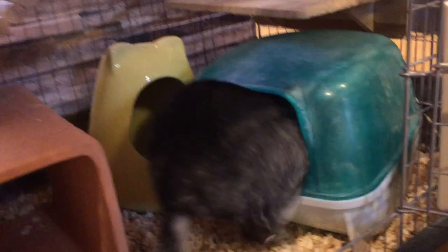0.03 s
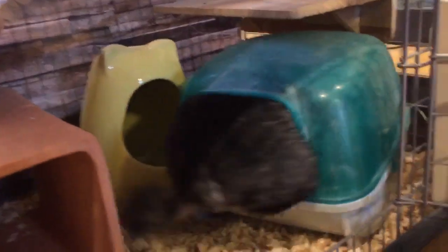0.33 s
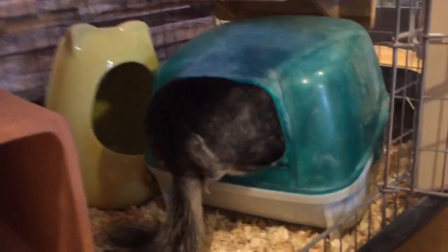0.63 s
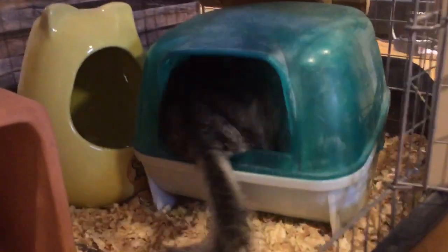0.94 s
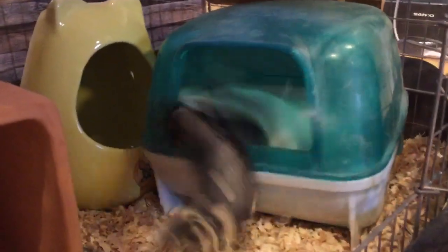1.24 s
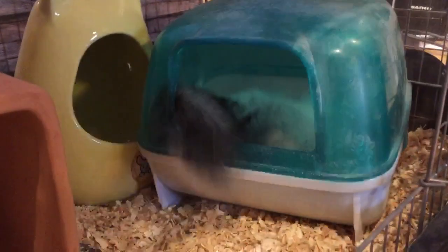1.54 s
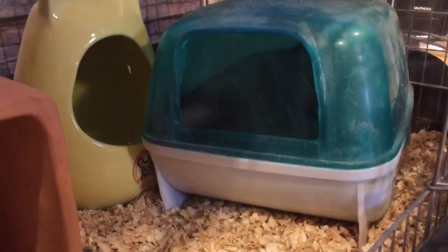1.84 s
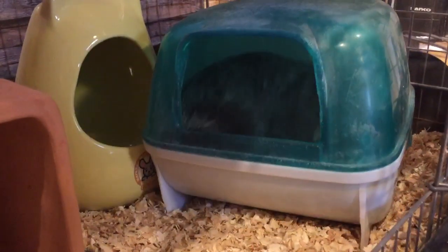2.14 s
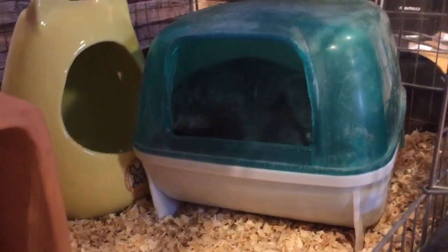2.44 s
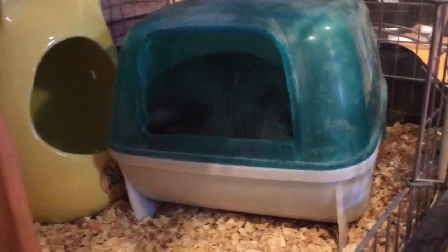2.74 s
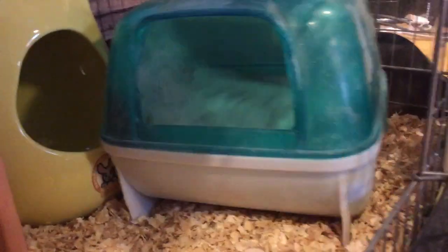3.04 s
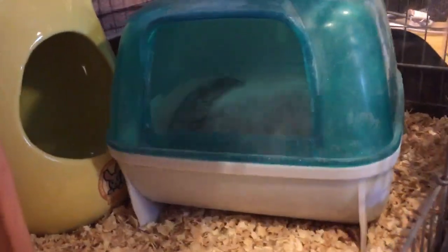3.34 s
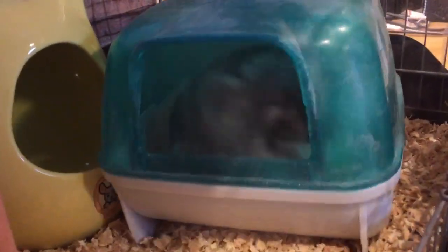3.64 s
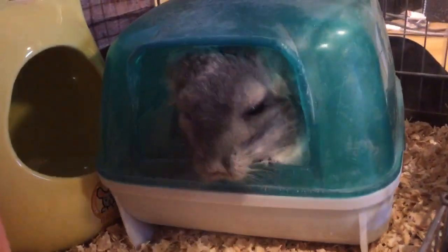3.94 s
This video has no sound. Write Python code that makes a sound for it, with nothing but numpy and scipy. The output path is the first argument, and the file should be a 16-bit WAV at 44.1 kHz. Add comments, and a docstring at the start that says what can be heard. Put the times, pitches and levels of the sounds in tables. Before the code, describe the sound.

A chinchilla scrabbles in a plastic sand bath, close by in a small, quiet room. Soft padded thumps, low rubbing and faint paw squeaks come first. From about 1.3 to 2 seconds it rolls, with hollow knocks, swishing sand and fur, and brief rings of cage wire. After a lull, it rolls again from 2.9 seconds, knocking loudest near 2.9 and 3.3, and settles just before 4 seconds.

```python
"""A low rub, a swish of sand and padded footfalls: a chinchilla is climbing into its plastic bath house.
It scrabbles and rolls in the fine sand, rests, and rolls again. Paws and body knock the hollow shell,
harder blows shake the wire cage beside it, fur brushes the walls and paws squeak faintly on the plastic.
One microphone, close by, in a small, quiet room."""
import sys
import numpy as np
from scipy import signal
from scipy.fft import rfft, irfft, next_fast_len
from scipy.io import wavfile
from scipy.ndimage import uniform_filter1d, map_coordinates

SR = 44100
rng = np.random.default_rng(int(sys.argv[2]) if len(sys.argv) > 2 else 0)


def dump(signal):
    """Clip the signal to [-1, 1] and save it as 16-bit WAV at the path in sys.argv[1]."""
    limited = np.clip(np.atleast_2d(signal).T, -1, 1)
    pcm = np.round(limited * 32767).astype(np.int16)
    wavfile.write(sys.argv[1], SR, pcm)


N = 176400

# The body shifting on the tray. Each row: time in seconds, relative level in dB.
RUB_LEVELS = [(.06, -31), (.088, -37), (.2, -39.5), (.29, -50), (.36, -33), (.44, -72), (.7, -51.5),
              (.92, -55), (1.12, -44.5), (1.32, -54.5), (1.46, -35.5), (1.58, -36), (1.73, -47.5),
              (1.95, -47), (2.18, -54.5), (2.45, -69), (2.77, -66), (2.93, -43.5), (3.05, -34), (3.2, -43),
              (3.42, -42.5), (3.66, -41), (3.83, -38.5), (3.9, -48), (4, -67)]
# The tray's rumble. Each row: frequency in Hz, gain in dB.
TRAY_COLOUR = [(25, -64), (45, 4.5), (80, -2.5), (120, 7), (170, 4.5), (235, 1.5), (290, -4), (370, -5),
               (520, -16.5), (1000, -22.5), (2500, -39), (6000, -103)]
# Fur brushing walls and bedding. Each row: time in seconds, relative level in dB.
FUR_LEVELS = [(.08, -47), (.26, -67), (.35, -57), (.55, -59.5), (.7, -61), (.81, -55), (.93, -60),
              (1.1, -57), (1.3, -57), (1.55, -45.5), (1.88, -54.5), (2.15, -68.5), (2.47, -62.5),
              (2.68, -79), (2.77, -64.5), (2.9, -58), (3.13, -44.5), (3.42, -46), (3.68, -44), (3.9, -61.5),
              (4, -74)]
# The tone of that brushing. Each row: frequency in Hz, gain in dB.
FUR_COLOUR = [(200, 8), (600, -1.5), (1100, 5), (2000, 2), (2800, -1.5), (3900, -3.5), (5200, -5),
              (8500, -7.5), (15000, -14)]
# Wall resonances that the fur excites. Each row: frequency in Hz, width in Hz, gain in dB.
BRUSHED_MODES = [(1100, 60, 3), (1421, 50, 4), (2050, 70, 8), (3836, 60, 4), (4650, 90, -1)]
# Claws flicking sand. Each row: start in seconds, level in dB, time to the peak in seconds.
CLAW_FLICKS = [(0.084, -50, .0038), (0.159, -45, 0.0052), (.385, -43.5, .0031), (0.759, -52, 0.0043),
               (0.903, -54, 0.013), (1.591, -32, 0.0039), (2.193, -64, 0.0089), (2.262, -64, .0046),
               (3.061, -41, .0065), (3.132, -38.5, 0.0051)]
# Sand sliding through fur and over the tray. Each row: time in seconds, relative level in dB.
SAND_LEVELS = [(.06, -100), (.088, -56.5), (.24, -59.5), (.37, -55), (.43, -62), (.57, -65), (.62, -66.5),
               (.68, -55.5), (.73, -72), (.83, -76), (.93, -69), (1.04, -62.5), (1.15, -54), (1.32, -55.5),
               (1.44, -44.5), (1.53, -52), (1.66, -48.5), (1.73, -54.5), (1.86, -51), (1.98, -51),
               (2.1, -69.5), (2.4, -86), (2.79, -98), (2.82, -51.5), (3.0, -51), (3.14, -52), (3.21, -57),
               (3.4, -52), (3.62, -54), (3.82, -57), (3.93, -55), (4, -73)]
# The sand's hiss. Each row: frequency in Hz, gain in dB.
SAND_COLOUR = [(150, -33), (500, -19), (1000, -9), (2000, -8), (2800, -7.5), (4000, -5), (5200, -5.5),
               (6500, -1), (7600, -6.5), (8800, 1.5), (10300, -3.5), (12000, 3), (14000, 0.5),
               (15800, -4.5)]
# Blows on the house. Each row: start in seconds, contact time in seconds,
# relative levels of thump, shell clatter and gritty scrape in dB, favoured pitch in Hz.
KNOCKS = [(.127, 0.0093, -41.5, -58, -52.5, 125), (.162, 0.014, -35.5, -51, -51, 125),
          (.186, .004, -36, -54, -57, 125), (.356, 0.019, -34.5, -50, -50, 3900),
          (.388, 0.0064, -47, -67, -59, 175), (.464, 0.0091, -33, -45.5, -51.5, 3900),
          (.632, 0.0077, -41.5, -56, -55, 3900), (.833, 0.0042, -72, -52, -63, 1400),
          (.84, 0.0079, -38, -49, -48, 3900), (.975, 0.033, -37.5, -54, -53, 3900),
          (1.01, 0.0053, -48, -50, -68, 1400), (1.076, 0.008, -39, -57, -65, 175),
          (1.2, 0.021, -43, -56.5, -52, 1860), (1.349, 0.0058, -39, -39, -41, 800),
          (1.356, 0.015, -26, -26.5, -45.5, 724), (1.381, 0.019, -25, -28, -34, 480),
          (1.435, 0.015, -22.5, -35, -36, 199), (1.472, 0.025, -29, -41.5, -61, 376),
          (1.498, 0.023, -32, -43.5, -63, 200), (1.591, 0.02, -30.5, -39, -39, 125),
          (1.641, .015, -34, -40.5, -38, 2060), (1.667, .018, -32, -43, -49, 374),
          (1.761, 0.023, -19.5, -27, -36.5, 234), (1.928, 0.018, -34, -39.5, -60, 2060),
          (1.982, 0.013, -41.5, -62, -80, 234), (2.092, 0.018, -40.5, -51.5, -77, 2050),
          (2.3, .012, -54, -72, -74, 127), (2.863, 0.016, -33.5, -58, -48, 234),
          (2.943, 0.013, -16.5, -20.5, -38, 1070), (2.992, 0.015, -27.5, -35.5, -41.5, 374),
          (3.046, 0.068, -40, -43, -62, 1060), (3.092, .009, -37, -45, -49, 2060),
          (3.237, 0.0088, -35, -36, -43, 2050), (3.278, 0.0036, -34.5, -47, -62, 175),
          (3.307, 0.0088, -18, -28, -41, 1400), (3.316, .023, -17.5, -23, -33.5, 720),
          (3.438, 0.011, -52, -46, -58, 2060), (3.488, 0.019, -26, -33, -39.5, 1380),
          (3.527, 0.0071, -35, -43, -56, 378), (3.588, 0.014, -31, -34, -37, 2040),
          (3.611, 0.013, -31.5, -38.5, -43, 125), (3.637, 0.0095, -32.5, -50, -71, 378),
          (3.72, 0.0061, -27.5, -30, -33.5, 880), (3.729, 0.0095, -28.5, -23, -40.5, 1430),
          (3.788, 0.013, -30.5, -36, -43.5, 378)]
# Resonances of the hollow shell. Each row: frequency in Hz, width in Hz, gain in dB.
SHELL_MODES = [(130, 32, -.5), (172, 30, -1), (238, 32, 4.5), (378, 34, 0), (425, 36, -8), (470, 40, -6),
               (655, 44, -1), (798, 18, -7), (924, 26, -14), (1034, 17, -7), (1100, 20, -9),
               (1310, 50, -15), (1421, 20, -6), (1870, 45, -14), (2060, 50, -11), (2360, 60, -16),
               (3900, 240, -20)]
# Broad response of the walls. Each row: frequency in Hz, gain in dB.
WALL_COLOUR = [(22, -66), (45, -8), (100, -2), (230, 2), (310, -16.5), (600, -12), (1200, -14), (1600, -13),
               (2100, -19.5), (2900, -22), (4000, -23.5), (5200, -26.5), (9000, -31), (15500, -31)]
# Paws slipping. Each row: start and length in seconds, first and last pitch in Hz, level in dB.
SQUEAKS = [(0.309, .042, 310, 295, -59), (0.577, 0.022, 840, 710, -53.5), (.652, 0.064, 376, 321, -53.5),
           (0.937, 0.048, 880, 1080, -60.5), (2.571, 0.15, 920, 842, -68)]
# Bumps on the cage. Each row: start in seconds, relative level in dB, brightness in dB per octave.
CAGE_BUMPS = [(1.383, -42, -3), (1.643, -47, 0), (1.763, -30, -8), (1.93, -43, -17), (2.093, -50, -20),
              (2.991, -41, -1), (3.238, -35, 0), (3.325, -33, -10), (3.49, -38, -7), (3.589, -34.5, 0),
              (3.73, -35, -6), (3.789, -37.5, 1)]
# Modes of the cage wire. Each row: frequency in Hz, gain in dB.
WIRE_MODES = [(1988, -7.5), (2052, -6), (2116, -10), (2358, -13), (3707, -11), (3836, -4), (4066, -11),
              (4650, -12), (5948, -10)]
# The small room's decay. Each row: frequency in Hz, seconds to fall 60 dB.
ROOM_T60 = [(100, 0.23), (700, 0.14), (2000, 0.19), (5000, 0.14)]
# The room's own hush. Each row: frequency in Hz, gain in dB.
ROOM_TONE_COLOUR = [(25, 3.5), (130, 0), (250, -12), (900, -18), (3000, -21.5), (6000, -27), (10000, -35),
                    (15500, -34)]

RISE_S, SCATTER_DB = .0015, 2.2  # rise of a hard contact; chance spread of the modes from blow to blow


def amp(db):
    """Gain of a level in dB."""
    return 10 ** (np.asarray(db) / 20)


def unit(x):
    """x at rms 1."""
    return x / np.sqrt(np.mean(x ** 2) + 1e-20)


def along(points, hz):
    """(Hz, value) points read on a log axis."""
    f, v = np.transpose(points)
    return np.interp(np.log(hz + 1), np.log(f + 1), v)


def level(rows):
    """Gain per sample of an (s, dB) curve."""
    return amp(np.interp(np.arange(N) / SR, *np.transpose(rows)))


def wobble(rate):
    """A smooth random curve, rate knots a second."""
    return map_coordinates(rng.standard_normal(N // 8), [np.arange(N) * rate / SR], mode="wrap")


def coloured(x, points, resonances=()):
    """x through a causal filter: an (Hz, dB) curve with resonances standing on it."""
    size = 2 * next_fast_len(len(x))
    f = np.fft.rfftfreq(size, 1 / SR)
    power = amp(along(points, f)) ** 2
    for hz, width, db in resonances:
        power += amp(db) ** 2 / (1 + ((f - hz) / (.78 * width)) ** 2) ** 2
    cepstrum = irfft(np.log(power) / 2)
    cepstrum[1:size // 2] *= 2  # folded for minimum phase
    cepstrum[size // 2 + 1:] = 0
    return irfft(rfft(x, size) * np.exp(rfft(cepstrum)))[:len(x)]


def band(x, hz, kind, order=4):
    """Butterworth filter."""
    return signal.sosfilt(signal.butter(order, hz, kind, fs=SR, output="sos"), x)


def add(out, start, x):
    """Mix x into out, start seconds in."""
    i = round(start * SR)
    out[i:i + len(x)] += x[:N - i]


def hollow(x, echo_db, span_s=.008):
    """Close echoes between the walls of the house colour the sound inside it."""
    echoes = rng.standard_normal(int(span_s * SR))
    return x + amp(echo_db) * signal.fftconvolve(x, echoes / np.linalg.norm(echoes))[:len(x)]


def rubbing(gain_db=-2, jerk_db=2):
    """The body drags in jerks over the tray, which rumbles."""
    drag = rng.standard_normal(N) * amp(jerk_db * wobble(35))
    return amp(gain_db) * level(RUB_LEVELS) * unit(coloured(drag, TRAY_COLOUR))


def fur(gain_db=-4, bristle_db=2.2):
    """Fur brushes softly and unevenly, duller than the sand, and rings in the walls."""
    hairs = rng.standard_normal(N) * amp(bristle_db * wobble(90))
    return amp(gain_db) * level(FUR_LEVELS) * unit(coloured(hairs, FUR_COLOUR, BRUSHED_MODES))


def claw_flicks():
    """Sand spurts where a claw flicks it."""
    out, t = np.zeros(N), np.arange(SR // 6) / SR
    for start, db, peak_s in CLAW_FLICKS:
        hiss = unit(coloured(rng.standard_normal(len(t)), SAND_COLOUR))
        add(out, start, amp(db) * hiss * t / peak_s * np.exp(1 - t / peak_s))
    return out


def sand(gain_db=.5, grain_db=3.5, flutter_db=2.4, ticks_per_s=170):
    """As the animal moves, fine grains hiss and single coarse ones tick on the plastic."""
    fine = rng.standard_normal(N) * amp(grain_db * wobble(1900))
    ticks = (rng.random(N) < ticks_per_s / SR) * amp(4 * rng.standard_normal(N))
    coarse = band(ticks, 350, "low", order=1) * rng.standard_normal(N)  # each tick is a tiny noise burst
    grains = unit(fine) + amp(-4) * unit(coarse)
    movement = amp(gain_db + flutter_db * wobble(45)) * level(SAND_LEVELS)
    return movement * unit(coloured(hollow(grains, echo_db=-13), SAND_COLOUR))


def struck_shell(envelope, response):
    """The shell answers a scuff of tiny contacts that drives all frequencies about equally."""
    scuff = rng.standard_normal(len(envelope)) * envelope
    white = irfft(np.exp(1j * np.angle(rfft(scuff))), len(scuff))
    local_rms = np.sqrt(np.abs(uniform_filter1d(white ** 2, size=200)) + 1e-20)
    return signal.fftconvolve(envelope * white / local_rms, response)[:len(scuff)]


def blow(x, db, span_s=.03):
    """x with the energy of a sound held at db for span_s."""
    return x * amp(db) / np.sqrt(np.sum(x ** 2) / (span_s * SR))


def knocks(inside_s=1.3, thump_hz=510, scrape_hz=2600, favour_db=5.5, favour_octaves=.2):
    """Paws and body strike the house: a low thump, a clatter of shell and a gritty scrape."""
    out, t = np.zeros(N), np.arange(SR // 3) / SR
    for start, contact_s, thump_db, clatter_db, scrape_db, favoured_hz in KNOCKS:
        modes = []
        for hz, width, db in SHELL_MODES:  # the spot struck favours the modes near one pitch
            lift_db = favour_db * np.exp(-(np.log2(hz / favoured_hz) / favour_octaves) ** 2)
            modes.append((hz, width, db + lift_db + SCATTER_DB * rng.normal()))
        response = coloured(signal.unit_impulse(len(t)), WALL_COLOUR, modes)
        contact = np.exp(-(t / contact_s) ** 2)
        lid_chatter = amp(-8 - 60 * t / .09)
        body_settling = amp(-14 - 60 * t / .08)
        hard = struck_shell((1 - np.exp(-t / RISE_S)) * (contact + lid_chatter), response)
        weight = struck_shell((1 - np.exp(-t / .001)) * (contact + body_settling), response)
        if start < inside_s:  # until the animal is inside, its padded feet thump lower
            thump = band(weight, 170, "low")
        else:
            thump = band(weight, [115, thump_hz], "band", order=2)
        clatter = band(hard, [thump_hz, scrape_hz], "band", order=3)
        scrape = band(hollow(hard, echo_db=-3), scrape_hz, "high")
        add(out, start, blow(thump, thump_db - .5))
        add(out, start, blow(clatter, clatter_db - 1))
        add(out, start, blow(scrape, scrape_db - 2))
    return out


def squeaks(waver=.11):
    """Paws stick and slip on the plastic: short, unsteady tones."""
    out = np.zeros(N)
    for start, length, first_hz, last_hz, db in SQUEAKS:
        n = int(length * SR)
        hz = np.linspace(first_hz, last_hz, n) * (1 + waver * wobble(369)[:n])
        tone = np.sqrt(2) * np.sin(2 * np.pi * np.cumsum(hz) / SR)
        add(out, start, amp(db) * signal.windows.tukey(n) * tone)
    return out


def cage(low_hz=2000, low_t60_s=.205):
    """The wires ring briefly when the house bumps them; the higher modes die sooner."""
    out, t = np.zeros(N), np.arange(SR // 3) / SR
    for start, db, tilt_db in CAGE_BUMPS:
        ring = np.zeros(len(t))
        for hz, mode_db in WIRE_MODES:
            polarity = rng.choice([-1, 1])
            struck_db = mode_db + tilt_db * np.log2(hz / low_hz) + SCATTER_DB * rng.normal()
            t60 = low_t60_s * np.sqrt(low_hz / hz)
            ring += polarity * amp(struck_db - 60 * t / t60) * np.sin(2 * np.pi * hz * t)
        add(out, start, amp(db) * ring * (1 - np.exp(-t / RISE_S)))
    return out


def room(x, delay_s=.006):
    """The near walls return a short tail in which each frequency dies at its own speed."""
    hz, t, spectrum = signal.stft(rng.standard_normal(SR // 2), SR, nperseg=256)
    decay = amp(-60 * t / along(ROOM_T60, hz)[:, None])
    tail = signal.istft(spectrum * decay, SR, nperseg=256)[1]
    tail = np.concatenate([np.zeros(int(delay_s * SR)), tail])
    return signal.fftconvolve(x, tail / np.linalg.norm(tail))[:N]


def scene(reverb_db=-9, room_tone_db=-61.5):
    """The bath house close up, the room behind it, over a faint room tone."""
    bath = knocks() + cage() + claw_flicks() + sand() + fur() + rubbing() + squeaks()
    room_tone = amp(room_tone_db) * unit(coloured(rng.standard_normal(N), ROOM_TONE_COLOUR))
    return (bath + amp(reverb_db) * room(bath) + room_tone)[None]


def record(dry, silent_s=.0822, low_cut_hz=48, top_hz=15900):
    """A moment of silence, then the microphone, which sheds the deepest bass and the highest treble."""
    fade_in = np.clip((np.arange(N) / SR - silent_s) / .00052, 0, 1)
    picked_up = band(dry, low_cut_hz, "high", order=3) * fade_in
    size = next_fast_len(N + SR // 2)
    passband = np.fft.rfftfreq(size, 1 / SR) < top_hz
    return irfft(rfft(picked_up, size) * passband, size)[:, :N]


dry = scene()
out = record(dry)
dump(out)
```